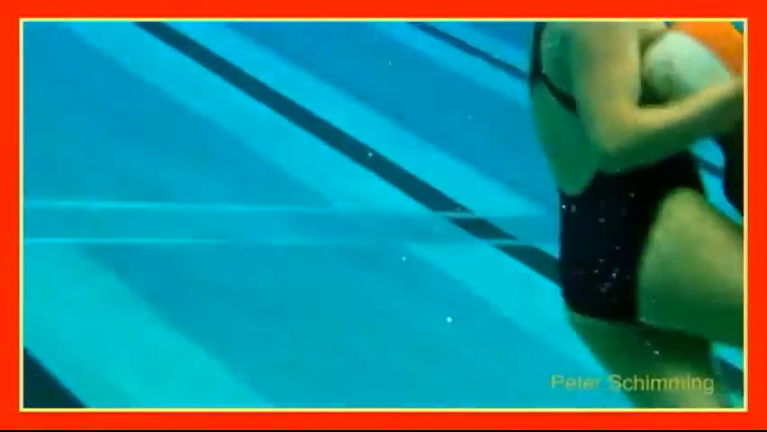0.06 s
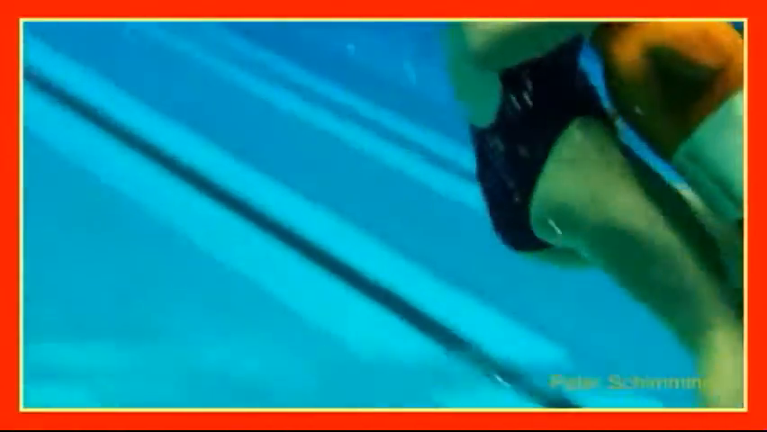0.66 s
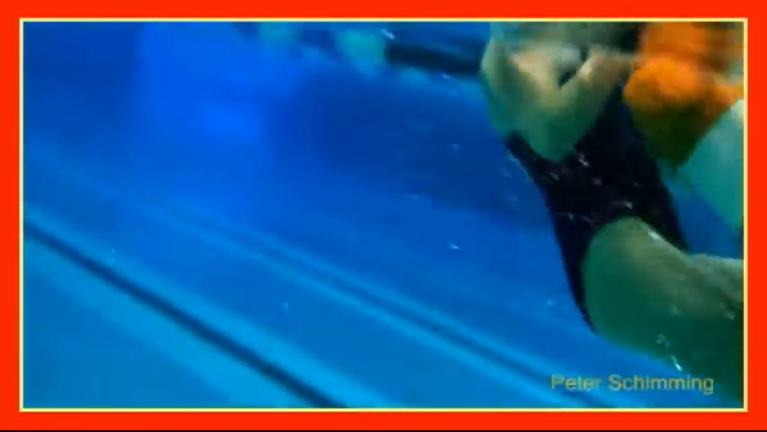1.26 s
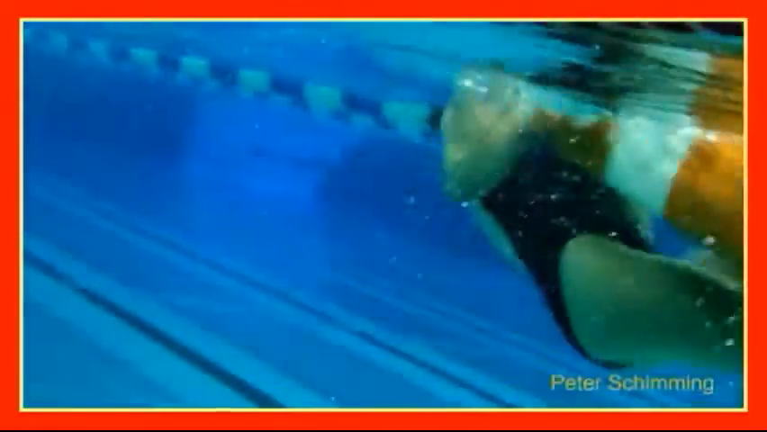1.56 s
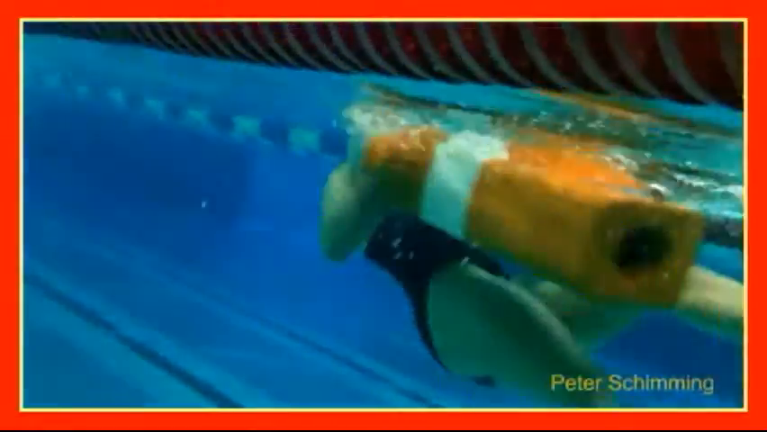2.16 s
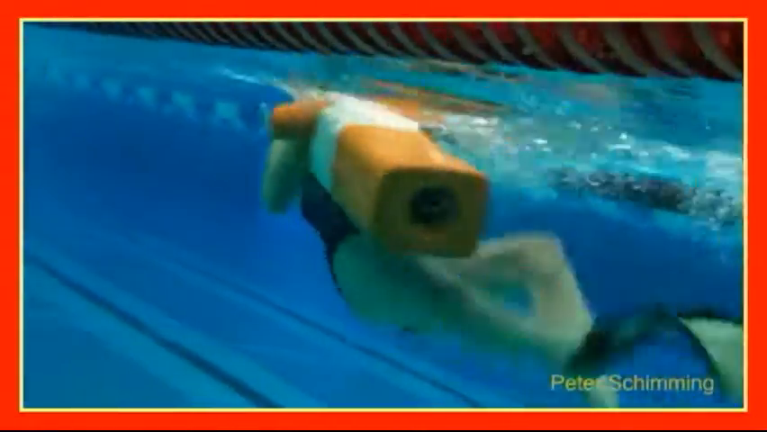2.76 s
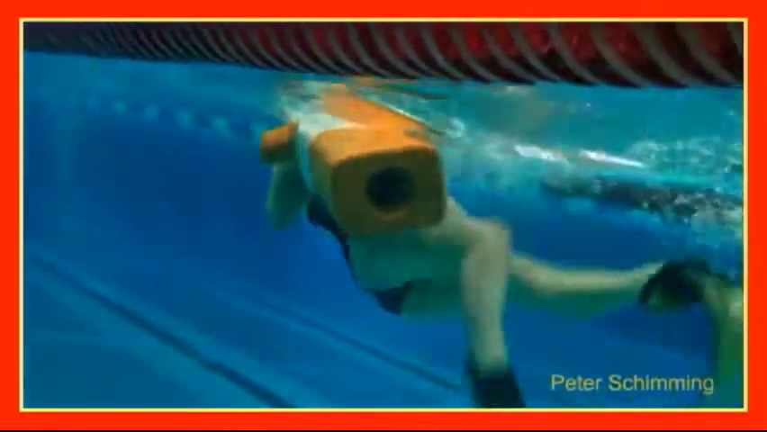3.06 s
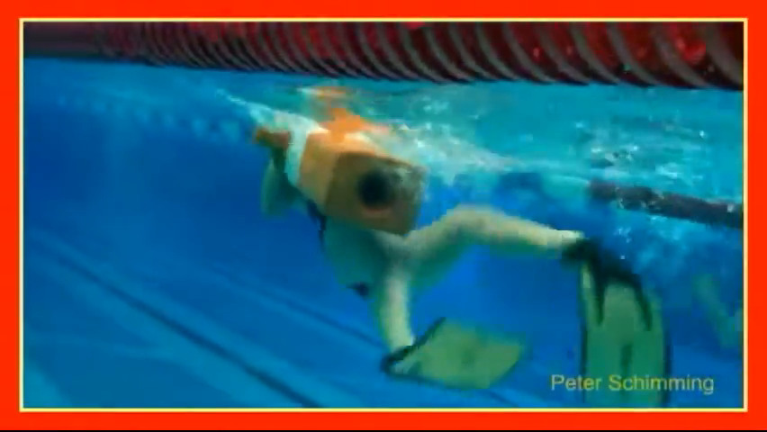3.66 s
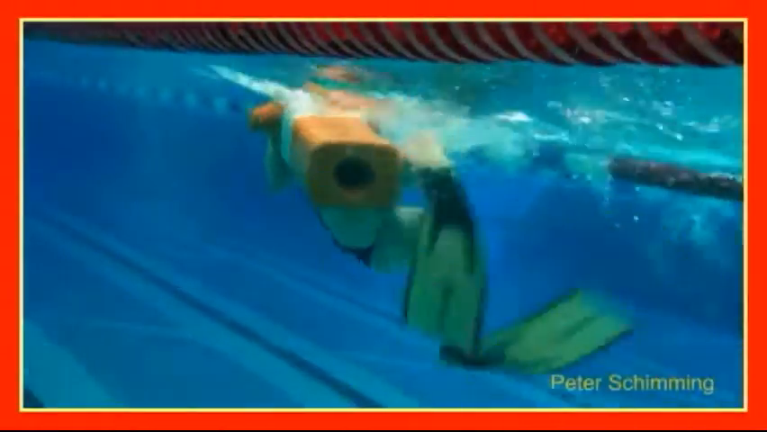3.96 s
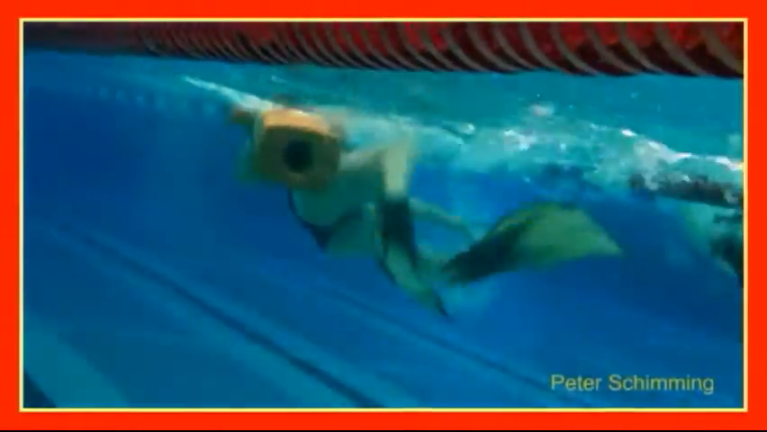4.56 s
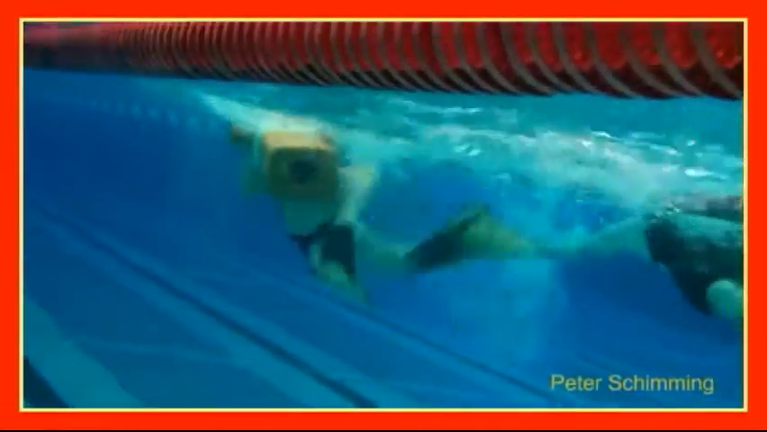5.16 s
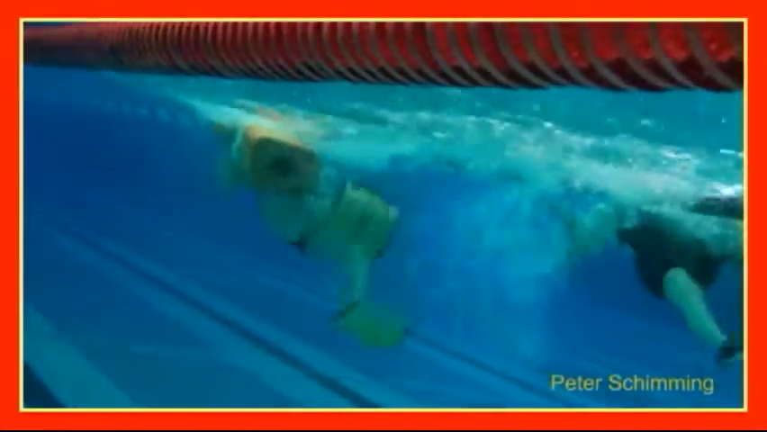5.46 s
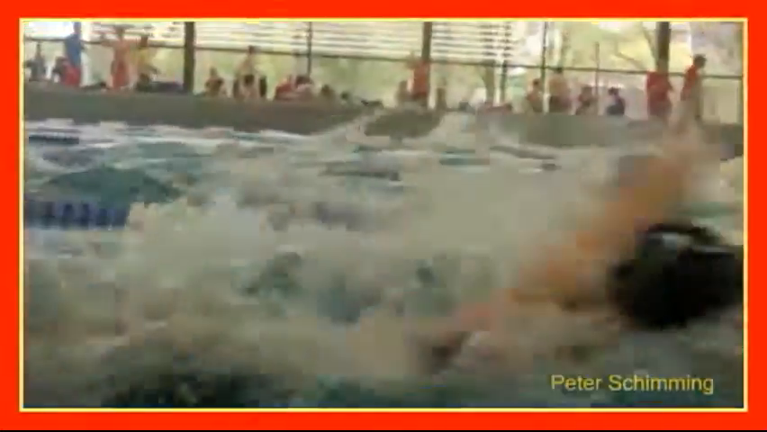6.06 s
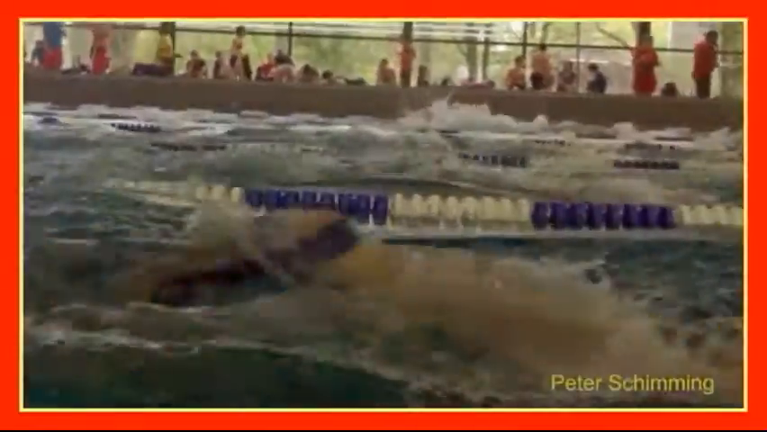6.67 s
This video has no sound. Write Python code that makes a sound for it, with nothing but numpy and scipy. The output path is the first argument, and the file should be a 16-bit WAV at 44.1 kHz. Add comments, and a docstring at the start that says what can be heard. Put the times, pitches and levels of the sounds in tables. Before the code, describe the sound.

Fin kicks churn a deep, pulsing underwater rumble with gulping bubbles and faint fizz, until the sound rises into sloshing surface water.

```python
"""A pool, heard under water through the two microphone ports of a sealed camera housing, close to swimmers.
From the start their fins beat in clouds of air that throb near 70 Hz; the water gurgles with a hollow ring,
single bubbles gulp, and above 3 kHz only a faint fizz gets through, doubled by a quick echo.
The kicking lies to the left, crosses to the right after 3.3 s, then drifts back.
Near 5.9 s the camera rises into the splashing surface: the wash brightens and spray crackles on it."""
import sys
import numpy as np
from scipy import signal
from scipy.fft import rfft, irfft
from scipy.io import wavfile
from scipy.ndimage import uniform_filter1d

SR = 44100
rng = np.random.default_rng(int(sys.argv[2]) if len(sys.argv) > 2 else 0)


def dump(signal):
    """Clip the signal to [-1, 1] and save it as 16-bit WAV at the path in sys.argv[1]."""
    limited = np.clip(np.atleast_2d(signal).T, -1, 1)
    pcm = np.round(limited * 32767).astype(np.int16)
    wavfile.write(sys.argv[1], SR, pcm)


N = 300756
T = np.arange(N) / SR
SIDES = np.array([[1], [-1]])  # left port, right port
THROB_WIDTH_S = 0.0165  # about half the length of one throb


# fin kicks beat clouds of air into the water: crest t/s, level/dB, half length/s
KICKS = [(.02, -14, .045), (.2, -15.5, .06), (.5, -16, .14), (.77, -16, .03), (1.15, -20.5, .08),
         (1.73, -16.5, .04), (2.0, -21.5, .12), (2.27, -16, .11), (2.44, -16, .04), (2.64, -15, .1),
         (2.87, -16.5, .07), (3.07, -17, .05), (3.74, -18, .16), (4.02, -18, .08), (4.3, -16, .1),
         (4.48, -18, .035), (4.98, -21, .2), (5.46, -15, .04), (5.71, -21, .04), (5.825, -14.5, .04),
         (6.06, -16.5, .045), (6.24, -15, .04), (6.44, -16, .025), (6.64, -14.5, .16)]
def kick_surges():
    """Strength of the pulsating air: each surge swells and fades, and their powers add."""
    power = sum(undb(db) ** 2 * np.exp(-((T - s) / half_s) ** 2) for s, db, half_s in KICKS)
    return np.sqrt(power + 1e-12)


def pulsation(age, hz, phase=0):
    """One throb: a deep tone in one short swell."""
    return np.exp(-(age / THROB_WIDTH_S) ** 2 / 2) * np.sin(2 * np.pi * hz * age + phase)


# pitch of the air clouds, lower for larger ones: t/s, f/Hz
CLOUD_PITCH = [(0, 69), (1.1, 76), (1.65, 70), (2.25, 75), (2.75, 68), (3.1, 73), (3.7, 67), (4.1, 73),
               (5.0, 76), (5.85, 66), (6.3, 75)]
def throbs(count, per_second, gap_spread, port_lag_rad):
    """Air clouds pulsate at uneven gaps; each is out of step with the one before, so they beat."""
    out = np.zeros((2, N))
    s, phase = 0, 0
    for gap, slip, tilt in rng.standard_normal((count, 3)):
        near = np.abs(T - s) < 4 * THROB_WIDTH_S
        hz = np.interp(s, *np.transpose(CLOUD_PITCH))
        port_phase = port_lag_rad * tilt * SIDES  # the ports lie at different distances from a cloud
        out[:, near] += pulsation(T[near] - s, hz, phase + port_phase)
        wait = np.exp(gap_spread * gap) / per_second
        s += wait
        phase += 2 * np.pi * hz * wait + np.sign(slip) + slip / 2
    return steady(out, seconds=0.15)


# the loudest deep throbs and thumps of the rumble: crest t/s, f/Hz, peak level/dB
LOUD_THROBS = [(.142, 69, -9), (.237, 68, -10), (.338, 70, -10.5), (.653, 73, -4.7), (.688, 128, -20),
               (.696, 72, -10.5), (.91, 135, -23), (1.037, 77, -12.5), (1.088, 76, -13), (1.266, 74, -12),
               (1.376, 75, -15), (1.548, 64, -11), (1.613, 73, -10), (1.663, 70, -10.5), (2.332, 71, -8.3),
               (2.479, 73, -9.5), (2.995, 71, -10), (3.247, 69, -10), (4.423, 73, -5.6), (5.324, 65, -9.3),
               (5.382, 71, -10), (6.148, 63, -8.3), (6.387, 81, -10.5), (6.499, 73, -7.5), (6.545, 77, -7),
               (6.616, 70, -5.5), (6.661, 71, -5.8), (6.735, 72, -7), (6.784, 72, -6.3)]
def loud_throbs():
    """Single deep throbs stand out of the rumble."""
    return sum(undb(db) * pulsation(T - s, hz) for s, hz, db in LOUD_THROBS)


def ducking(depth):
    """Gain of the random throbbing, which ducks under each loud throb."""
    overlap = sum(np.exp(-((T - s) / THROB_WIDTH_S / 2) ** 2) for s, _, _ in LOUD_THROBS)
    return 1 - depth * np.minimum(overlap, 1)


# spectra of lesser air clouds, heaving water and small sloshing pockets: f/Hz, level/dB
RUMBLE_SPECTRUM = [(35, -14), (48, 0), (62, 0), (75, 3), (90, -2), (110, -12), (180, -36)]
HEAVE_SPECTRUM = [(10, -14), (22, -1), (32, 0), (55, -12)]
SLOSH_SPECTRUM = [(75, -16), (108, 4), (142, 0.5), (165, -6.5), (255, -6.5), (330, -24.5), (500, -36.5)]
def churn(surge, duck, surface, lull_db):
    """Lesser air clouds rumble on; whole water masses heave below them, smaller pockets slosh above."""
    rumble = steady(colour(turbulence(side_db=-11), RUMBLE_SPECTRUM), seconds=0.037)
    rumble *= undb(lull_db) * np.sqrt(duck)
    heave = steady(colour(turbulence(side_db=-8), HEAVE_SPECTRUM), seconds=0.12)
    heave *= undb(-34) * (1 + surge / undb(lull_db)) ** 0.25  # the water heaves more in a surge
    pockets = pops(per_second=1500, scatter_db=2, side_db=-3)  # so close that each port hears its own
    slosh = steady(colour(pockets, SLOSH_SPECTRUM), seconds=0.83)
    slosh *= undb(-29 - 6.5 * surface)
    return rumble + heave + slosh


def bubble(hz, t60, rise_per_s=0.35, swell_s=0.008):
    """A bubble rings at a pitch set by its size, which climbs as it nears the surface."""
    age = T[:SR // 4]
    return burst(age, swell_s, t60) * np.sin(2 * np.pi * hz * age * (1 + rise_per_s * age / 2))


# single large bubbles: t/s, f/Hz, level/dB, ring time t60/s
LARGE_BUBBLES = [(.17, 312, -25, 0.28), (.548, 445, -20.5, 0.074), (.83, 300, -22.5, 0.13),
                 (.922, 480, -22.5, 0.07), (.95, 312, -20.5, .15), (.985, 645, -27.5, 0.09),
                 (1.08, 312, -24, .17), (1.302, 436, -25.5, 0.15), (1.36, 455, -16.5, 0.043),
                 (2.305, 314, -24, 0.12), (2.945, 386, -27, 0.22), (3.24, 324, -27, .2),
                 (3.611, 454, -21.5, 0.083), (5.01, 310, -25.5, 0.14), (5.218, 515, -19, 0.041),
                 (5.902, 430, -24, 0.094), (6.38, 880, -36, 0.15), (6.57, 1295, -41.5, 0.22),
                 (6.661, 420, -19.5, 0.059)]
def gulps(count, low_hz, octaves, small_db, ring_cycles):
    """Large bubbles gulp among many random small ones, which ring softer and shorter the higher they are."""
    when, height, softness = rng.random((count, 3)).T
    pitch = low_hz * 2 ** (octaves * height)
    level_db = small_db - 14 * height - 8 * softness
    small_bubbles = np.column_stack([when * N / SR, pitch, level_db, ring_cycles / pitch])
    out = np.zeros(N + SR)
    for s, hz, db, t60 in np.vstack([LARGE_BUBBLES, small_bubbles]):
        ring, start = bubble(hz, t60), int(s * SR)
        out[start:start + len(ring)] += undb(db) * ring
    return out[:N]


# pitches of a hollow ring heard under water: f/Hz, width/Hz, level/dB
HOLLOW_RING_PEAKS = [(283.8, 8, 0.5), (314.6, 11, 4.5), (348.3, 8.2, -1), (390.5, 8.8, -4.5)]
# its changing strength: t/s, level/dB
HOLLOW_RING_LEVELS = [(0, -34.5), (.22, -33.5), (.45, -39), (1.03, -36.5), (1.27, -43), (1.75, -40.5),
                      (2.35, -35), (2.7, -40), (3.27, -35.5), (3.5, -40), (3.9, -35), (4.5, -39.5),
                      (4.9, -38), (5.33, -43), (5.55, -38.5), (5.8, -36.5), (6.05, -44.5)]
def hollow_ring(surface):
    """A hollow, gurgling ring at four about evenly spaced pitches, 280 to 390 Hz, fading at the surface."""
    push = pops(per_second=2500, scatter_db=2, side_db=-30)
    peaks = sum((-1) ** k * undb(db) * resonate(push, hz, width)
                for k, (hz, width, db) in enumerate(HOLLOW_RING_PEAKS))
    ring = steady(unit(resonate(peaks, hz=377, width_hz=210)), seconds=0.16)
    return ring * undb(curves(HOLLOW_RING_LEVELS)[0]) * (1 - 0.67 * surface)


# spectra of the bubble wash, microphone under water and at the surface: f/Hz, level/dB
SUBMERGED_SPECTRUM = [(150, -13), (300, -1), (440, -1.5), (650, -5.5), (950, -13), (1400, -22.5),
                      (2050, -25.5), (2600, -34.5), (3200, -40.5), (5000, -46), (9000, -62.5)]
SURFACE_SPECTRUM = [(130, -15), (185, 9), (260, -3), (650, -1), (890, -5.5), (1300, -10), (1700, -18),
                    (2950, -28.5), (3600, -38), (5200, -44), (11500, -60.5)]
def wash(surface):
    """Countless bubbles heard through the housing, brighter once the waves break over it."""
    under = colour(pops(per_second=5000, scatter_db=2, side_db=-9), SUBMERGED_SPECTRUM)
    above = colour(pops(per_second=3700, scatter_db=1, side_db=-14.5), SURFACE_SPECTRUM)
    blend = under * np.sqrt(1 - surface) + above * np.sqrt(surface)
    return blend * undb(-40 - 0.5 * surface)


# bubble puffs and water slaps right on the housing: t/s, centre f/Hz, width/Hz, level/dB, t60/s
PUFFS = [(.38, 12500, 3500, -65, .7), (.6, 13000, 3000, -63, 0.8), (1.52, 7040, 1800, -59, .12),
         (1.945, 12500, 4000, -48, 0.05), (3.22, 6600, 1300, -60.5, .25), (3.23, 11500, 4500, -63, .25),
         (4.075, 13500, 2500, -57, .12), (4.12, 4200, 1500, -67, .25), (4.43, 6600, 900, -49.5, 0.05),
         (4.8, 13800, 2500, -60.5, .16), (4.806, 3900, 1500, -52, .04), (5.68, 13200, 2200, -65, .6),
         (6.025, 3200, 1200, -58.5, 0.16), (6.04, 750, 500, -37.5, .13), (6.297, 6700, 750, -43.5, 0.04),
         (6.37, 7150, 700, -57.5, .35)]
def puffs(swell_share):
    """Tiny bubbles and slaps of water brush the housing; the longer a puff lasts, the slower it swells."""
    grains = pops(per_second=4500, scatter_db=3.3, side_db=-25.5)
    out = np.zeros((2, N))
    for s, hz, width, db, t60 in PUFFS:
        band = unit(resonate(resonate(grains, hz, width), hz, width))
        out += undb(db) * band * burst(T - s, swell_share * t60, t60)
    return out


# spectrum of tiny bubbles on the housing: f/Hz, level/dB
FIZZ_SPECTRUM = [(1500, -18.5), (3000, -6.5), (4100, -3), (5200, -9.5), (7900, -1), (9200, -5.5),
                 (10500, -0.5), (13400, -3.5), (15500, -7.5)]
# their changing strength: t/s, prickle level/dB, wall hiss level/dB
FIZZ_LEVELS = [(0.3, -67, -74), (0.45, -66, -72), (0.73, -65.5, -70), (1.15, -68.5, -76),
               (1.94, -65, -67.5), (2.4, -66.5, -71.5), (3.1, -66.5, -71), (3.35, -66, -67.5),
               (3.85, -66, -69.5), (4.08, -66, -64.5), (4.55, -67, -72), (4.94, -65, -66),
               (5.3, -67.5, -70.5), (6.02, -66.5, -69.5), (6.19, -74, -70.5), (6.45, -68, -60.5),
               (6.75, -65.5, -62)]
def fizz(surface, wall_hz, wall_width_hz):
    """Tiny bubbles prickle on the housing, less so at the surface, and sing in its wall resonance."""
    prickle_db, hiss_db = curves(FIZZ_LEVELS)
    prickle = colour(pops(per_second=12000, scatter_db=3.5, side_db=-21), FIZZ_SPECTRUM)
    hiss = turbulence(side_db=-32)
    for _ in range(2):
        hiss = resonate(hiss, wall_hz, wall_width_hz)
    return prickle * undb(prickle_db - 5.5 * surface) + unit(hiss) * undb(hiss_db)


# spectrum of drops landing on the housing: f/Hz, level/dB
SPRAY_SPECTRUM = [(2400, -5), (3050, 3.5), (3700, -13), (5250, 1), (8000, -2), (10100, -1), (11000, -5.5),
                  (15500, -11)]
def spray(surface):
    """Drops crackle on the housing as it comes out of the water."""
    drops = pops(per_second=4600, scatter_db=3, side_db=-20.5)
    return colour(drops, SPRAY_SPECTRUM) * undb(-60.5) * surface


def echo(x, echo_db, delay_s=0.02812):
    """A sound and its single reflection, together as strong as the sound alone."""
    gain, lag = undb(echo_db), round(delay_s * SR)
    late = np.pad(x, [(0, 0), (lag, 0)])[:, :N]
    return (x + gain * late) / np.sqrt(1 + gain ** 2)


def pops(per_second, scatter_db, side_db):
    """Random impulses of bubbles pinching off: many small, a few large."""
    size = undb(scatter_db * np.minimum(rng.exponential(size=(2, N)), 5))
    polarity = rng.choice([-1, 1], (2, N))
    fires = rng.random((2, N)) < per_second / SR
    return spread(size * polarity * fires, side_db)


def turbulence(side_db):
    """Random pressure at the two ports."""
    return spread(rng.standard_normal((2, N)), side_db)


def spread(pair, side_db):
    """Two unrelated sounds become the middle and the sides of a stereo pair."""
    return unit(pair[0] + undb(side_db) * pair[1] * SIDES)


def burst(age, swell_s, t60):
    """An envelope that swells from age zero and dies away."""
    age = np.clip(age, 0, 1)
    return (1 - np.exp(-age / swell_s)) * np.exp(-np.log(1000) * age / t60)


def resonate(x, hz, width_hz):
    """Two-pole resonance with gain 1 at its centre."""
    return signal.lfilter(*signal.iirpeak(min(hz, .45 * SR), hz / width_hz, fs=SR), x)


def colour(x, spectrum):
    """Filter by a spectrum of (f/Hz, level/dB) points and scale to rms 1."""
    hz, db = np.transpose(spectrum)
    f = np.maximum(np.fft.rfftfreq(N, 1 / SR), 1)
    gain = undb(np.interp(np.log(f), np.log(hz), db, left=-120, right=-120))
    return unit(irfft(rfft(x) * gain, N))


def steady(x, seconds):
    """Even out the slow swells of a sound, leaving its quick beating."""
    power = np.mean(x ** 2, axis=0)
    for _ in range(2):
        power = uniform_filter1d(power, max(int(seconds * SR), 8))
    return x / np.sqrt(power + 1e-12)


def curves(table):
    """Each column of a table joined by straight lines in time."""
    s, *columns = np.transpose(table)
    return [np.interp(T, s, column) for column in columns]


def unit(x):
    """Scale to rms 1."""
    return x / np.sqrt(np.mean(x ** 2))


def undb(db):
    """Decibels to gain."""
    return 10 ** (np.asarray(db) / 20)


# the microphone rises into the waves: t/s, share of the sound that comes from the surface/0-1
SURFACE_SHARE = [(5.85, 0.05), (5.92, 0.59)]
# where the swimmers kick, heard from the camera: t/s, left minus right level/dB
KICK_BALANCE = [(0, 3), (2.25, 4.6), (3.3, 0.2), (4.5, -3), (5.6, 0), (6.8, 1.8)]
def scene():
    """The deep sounds lean to the side where the swimmers kick; the bubbling stays a little to the left."""
    surface = curves(SURFACE_SHARE)[0]
    surge = kick_surges()
    duck = ducking(depth=0.7)
    deep = churn(surge, duck, surface, lull_db=-24) + loud_throbs()
    deep += duck * surge * throbs(count=160, per_second=19, gap_spread=0.15, port_lag_rad=0.28)
    deep *= undb(SIDES * curves(KICK_BALANCE)[0] / 2)
    bubbling = hollow_ring(surface) + echo(wash(surface), echo_db=-14)
    bubbling += gulps(count=130, low_hz=478.5, octaves=1.6, small_db=-28.5, ring_cycles=42)
    bubbling *= undb(SIDES)  # left 2 dB above right
    froth = echo(fizz(surface, wall_hz=6760, wall_width_hz=1100) + spray(surface), echo_db=-7)
    froth += echo(puffs(swell_share=0.07), echo_db=0)
    return deep + bubbling + froth


def record(dry):
    """The camera cuts the treble steeply above 15.8 kHz."""
    return signal.sosfilt(signal.ellip(10, .2, 80, 15800, fs=SR, output="sos"), dry)


dry = scene()
out = record(dry)
dump(out)
```